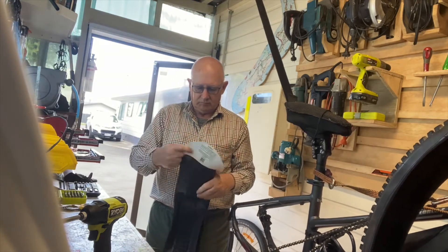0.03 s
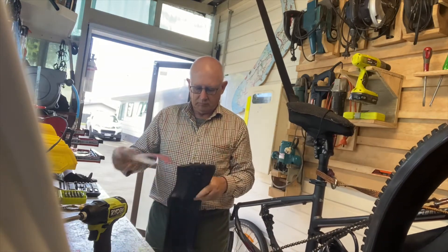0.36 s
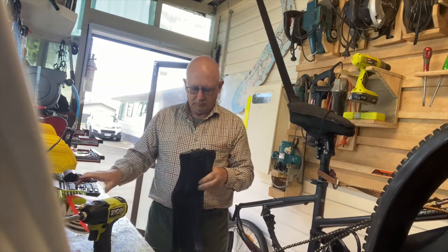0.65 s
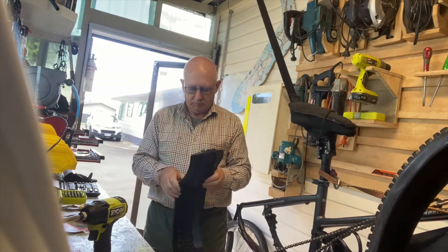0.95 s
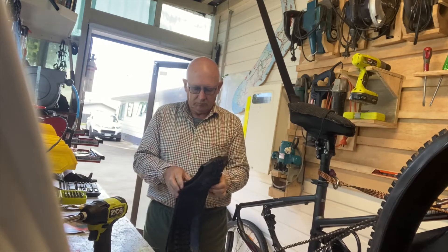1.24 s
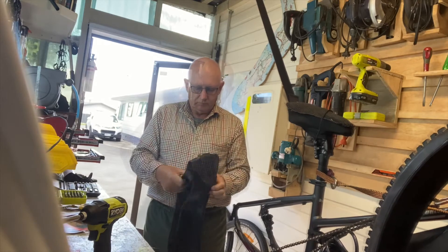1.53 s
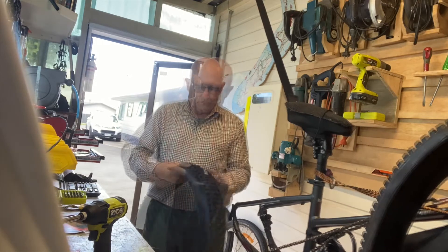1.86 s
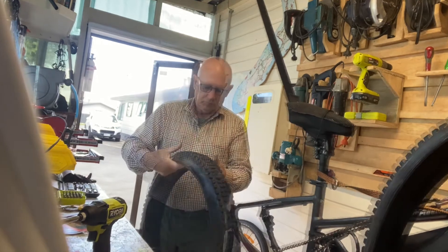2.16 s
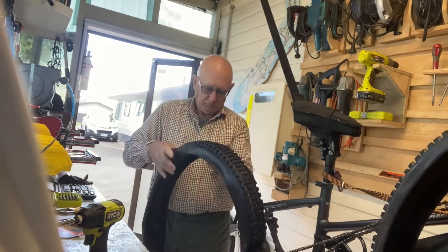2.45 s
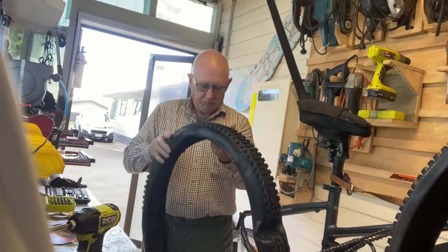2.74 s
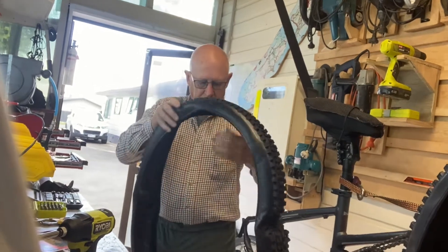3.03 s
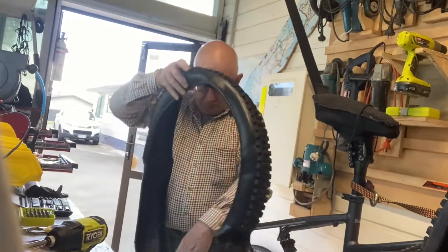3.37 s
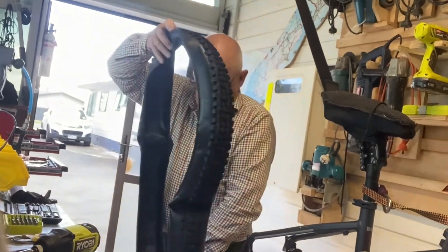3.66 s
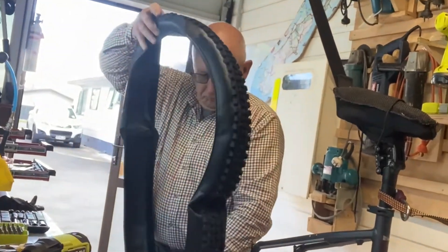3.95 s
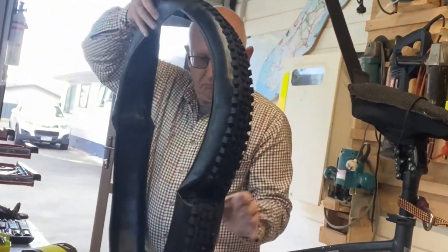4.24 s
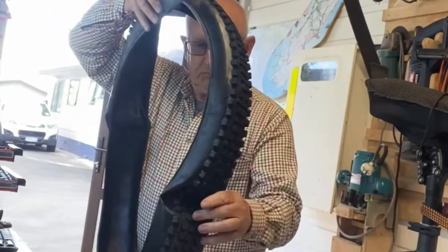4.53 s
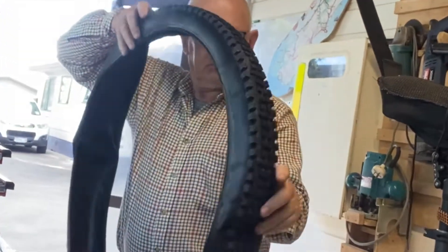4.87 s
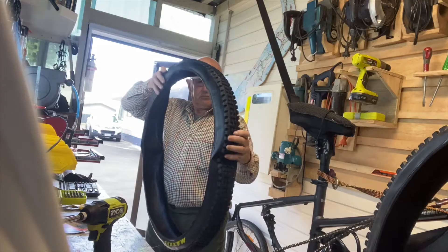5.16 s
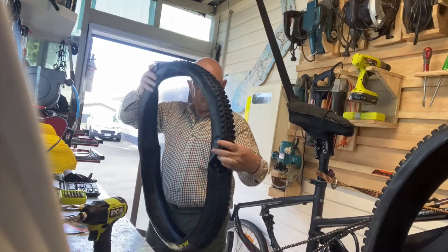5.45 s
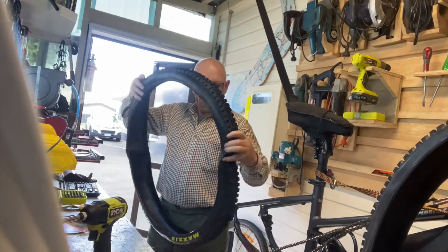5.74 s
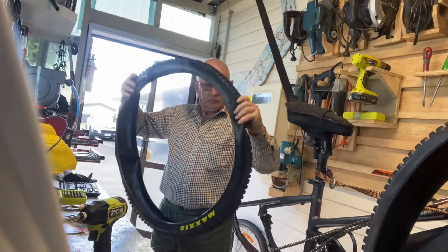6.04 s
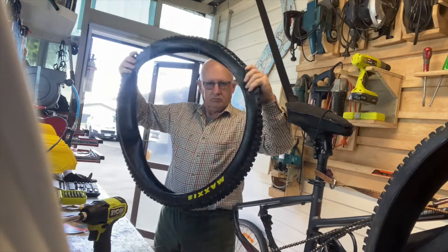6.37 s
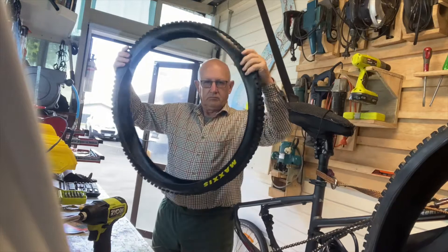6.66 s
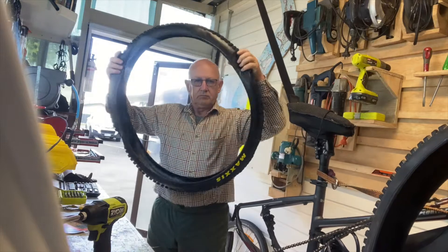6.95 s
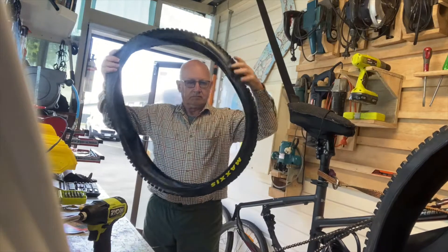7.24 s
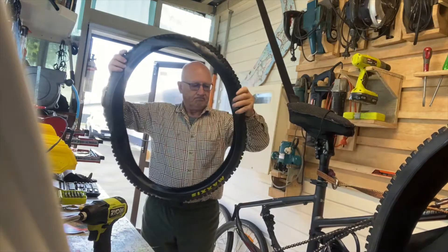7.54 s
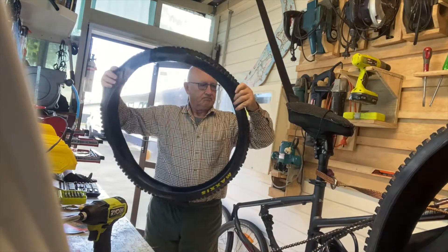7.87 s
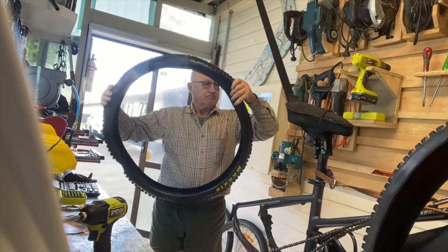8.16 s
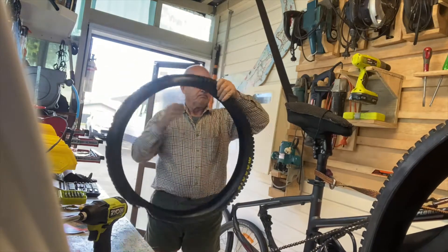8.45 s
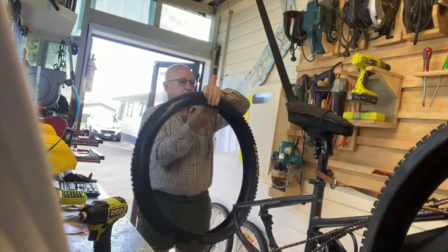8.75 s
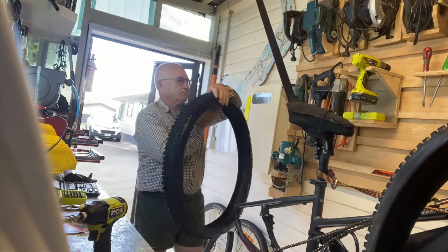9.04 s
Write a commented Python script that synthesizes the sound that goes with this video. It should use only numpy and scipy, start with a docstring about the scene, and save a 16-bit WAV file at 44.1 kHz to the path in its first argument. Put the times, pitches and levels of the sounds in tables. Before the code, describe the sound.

A low machine hum and distant traffic rumble run throughout in a small workshop with short reverberation. At the start, hands rub a nearby rubber bike tyre and it thumps. At 0.5 seconds stiff packaging clacks loudly onto a hollow, booming bench, followed by two small bounces. From 1 second the tyre unfolds with soft, irregular flops, dry ticks, faint hand friction and sleeve swishes. The hum dips around 2 seconds, then pulses slowly as a slightly higher motor joins. Heavier rubber thuds come near 3.7 seconds, and the tyre's edge cracks sharply at 4.9. More flops follow between 5.7 and 6.9 seconds, then a loud pop at 7.5 and a quick double snap at 8.4. The traffic grows from about 5 seconds until the end, just past 9. Very faint, thin squeaks and whistles come and go.

```python
"""Unpacking a bike tyre in a workshop.

Stiff packaging clacks onto a booming bench. The folded rubber casing flops and pops into shape,
with dry ticks and one sharp crack of the bead; hands stick and slip on it and sleeves brush past.
Two machines beat under a higher motor. The room is small and wood-lined; through its open door
street noise slowly grows. Faint, thin squeaks and whistles come and go, perhaps from afar."""
import sys
import numpy as np
from scipy import signal
from scipy.fft import rfft, irfft, next_fast_len
from scipy.io import wavfile
from scipy.ndimage import uniform_filter1d

SR = 44100
rng = np.random.default_rng(int(sys.argv[2]) if len(sys.argv) > 2 else 0)


def to_wav(s):
    """Save 16-bit WAV."""
    ch = np.atleast_2d(s).T  # columns
    pcm = np.round(np.clip(ch, -1, 1) * 32767)  # PCM
    wavfile.write(sys.argv[1], SR, pcm.astype(np.int16))


N = 405719
TIME_S = np.arange(N) / SR

# traffic drawing nearer: time_s, roar_db
TRAFFIC_LEVEL = [(0, -67.5), (4.3, -66.5), (5.6, -58.5), (6.5, -60.5), (9.2, -54.5)]
# spectra of traffic rumble, traffic roar and air hiss: freq_hz, gain_db
RUMBLE_SPECTRUM = [(25, -21), (45, 7.5), (85, 8), (150, 5), (270, -5.5), (400, -12.5), (800, -37)]
ROAR_SPECTRUM = [(170, 7.5), (290, 13), (450, 2.5), (600, 3), (850, -3), (1180, -2), (1700, -11.5),
                 (2600, -21.5), (4000, -29), (12000, -53.5)]
HISS_SPECTRUM = [(500, 3), (2000, 1), (5000, -2.5), (9000, -4.5), (11500, -3.5), (13000, -10)]
# machine hum: time_s, level_db, second_machine_ratio
HUM_LEVEL = [(0, -40, 0.06), (1.6, -40, 0), (2.0, -53, 0), (2.8, -44, 0.26), (4.3, -50, 0.95),
             (5.7, -44, 0.44), (6.6, -48.5, 0.55), (9.2, -48, 0.26)]
# second machine's lead, a beat null at each whole turn: time_s, lead_turns
HUM_LEAD = [(0, .4), (3.12, 3), (4.45, 5), (6.5, 9), (7.25, 11), (9.2, 15)]
# higher motor: time_s, level_db
MOTOR_LEVEL = [(1.7, -84), (2, -60), (5.4, -57.5), (5.7, -49), (6.4, -59.5), (7.4, -48.5), (8.35, -53),
               (9.2, -52)]
# faint, thin gliding squeaks and whistles, perhaps distant:
# start_s, length_s, start_hz, end_hz, width_hz, level_db
THIN_SQUEAKS = [(1.681, 0.23, 2724, 2527, 221, -75), (1.847, 0.95, 2130, 2045, 524, -80),
                (2.252, 0.51, 4200, 4010, 816, -82), (4.429, 0.062, 2120, 1874, 1203, -69),
                (5.073, 0.054, 2920, 3080, 396, -71), (6.932, 0.27, 2030, 2026, 218, -78),
                (7.53, 0.26, 2055, 2052, 147, -70.5), (7.878, 0.15, 2550, 2770, 527, -71),
                (7.98, 0.16, 2350, 2320, 522, -72), (8.197, 0.26, 2110, 2030, 380, -70)]
# workshop decay: freq_hz, t60_s
ROOM_DECAY = [(150, 0.27), (400, 0.34), (1000, 0.23), (3000, 0.26), (7500, 0.26), (13000, 0.24)]
# treble loss at the wooden walls: freq_hz, gain_db
WALL_SPECTRUM = [(3500, 0), (8000, -1), (13000, -2.5)]
# left-right likeness of diffuse sound: freq_hz, correlation
DIFFUSE_CORRELATION = [(60, 1), (130, 0.64), (260, 0.65), (550, 0.0089), (2000, 0.056), (5000, 0.26),
                       (8000, 0.85), (9300, 1), (11500, 0.38)]
# packaging landing on the bench: start_s, clack_db, boom_db, contact_s
LANDINGS = [(0.5435, -28, -35, 0.0047), (0.740, -41.5, -48, 0.0069), (0.779, -47.5, -48.5, 0.0086)]
# bench top and the hollow under it: pitch_hz, level_db, t60_s
BENCH_MODES = [(203, 31, 0.064), (198.7, 5, 0.74), (319, 23.5, 0.066), (304, -2, 0.25), (392, 0, 0.39),
               (623, 15, 0.057), (723, 11.5, 0.044)]
# spectra of packaging clack and casing slap: freq_hz, gain_db
CLACK_SPECTRUM = [(88, -17), (170, -2), (309, -11), (530, -10), (740, -8.5), (1010, -17.5), (1600, -11),
                  (2300, -16), (3300, -17), (4400, -24), (6030, -26.5), (7680, -24), (9200, -38.5),
                  (11000, -25), (13000, -38), (18000, -90)]
SLAP_SPECTRUM = [(200, -22), (400, -4.5), (600, -1.5), (860, 5.5), (1000, -4.5), (1150, 2.5), (1450, -8.5),
                 (1850, 2.5), (2350, -8.5), (2950, -2), (4000, -11.5), (5000, -15), (7300, -12),
                 (9200, -21), (11000, -11), (13000, -26), (18000, -102)]
# sleeves brushing past: centre_s, length_s, level_db
SLEEVE_BRUSHES = [(1.129,0.068,-71), (1.383,0.077,-73), (1.524,0.056,-54), (1.985,0.19,-76),
                  (2.347,0.1,-67), (2.717,0.068,-78), (3.456,0.19,-74), (3.793,.05,-60), (5.51,0.17,-77),
                  (5.997,0.17,-75), (6.356,0.16,-71.5)]
# hands sliding on rubber: centre_s, length_s, level_db, grip_db
HAND_STROKES = [(0.005, 0.043, -53, 15.5), (0.91, 0.28, -72.5, 9), (1.147, 0.15, -76.5, 9.5),
                (1.419, 0.39, -76.5, 7.5), (1.642, 0.26, -69, 12.5), (2.195, 0.057, -79.5, 7.5),
                (2.387, 0.42, -86.5, 14), (2.604, 0.92, -83, 9), (2.93, 0.11, -81.5, 6),
                (3.28, 0.14, -79, 12), (3.392, 0.087, -69, 9), (3.547, 0.067, -78.5, 4),
                (3.735, 0.53, -80, 10.5), (4.536, 0.39, -81, 10), (4.799, 0.039, -71.5, 8),
                (5.106, 0.23, -75.5, 10.5), (5.334, 0.059, -80.5, 8), (5.626, 0.16, -80.5, 11.5),
                (6.515, 0.15, -74.5, 10), (6.755, 0.14, -69.5, 7.5), (7.151, 0.082, -71, 8.5),
                (7.284, 0.028, -69.5, 11), (8.163, 0.14, -72, 11.5), (9.016, 0.3, -77, 11)]
# friction spectra for firm, medium and light touch: freq_hz, gain_db
CREAK_SPECTRUM = [(150, -35), (320, -8), (580, 0), (740, -10.5), (950, 0), (1250, -11.5), (1700, -18),
                  (3000, -17)]
RUB_SPECTRUM = [(800, -76), (1500, 13.5), (2100, 15), (3200, -16), (4500, -10), (8000, -62)]
SWISH_SPECTRUM = [(2000, -61), (4000, -22), (5500, -19.5), (7500, -7.5), (9200, -16), (11300, 6.5),
                  (12500, -13.5), (14000, 3)]
# dry ticks and one loud, sharp crack of the tyre bead: start_s, level_db, pitch_hz
TICKS_AND_CRACK = [(1.282,-60,1520), (1.565,-70,1140), (3.247,-69,1450), (3.388,-68,1000),
                   (4.911,-43.5,1850), (5.113,-58,930), (6.204,-65.5,1490), (6.776,-60,1410),
                   (6.813,-59,850)]
# casing flops and pops, the first row a card snapping off the tyre: # start_s, contact_s, slap_db,
# tilt_db_per_octave, thud_db, thud_hz, ring_db, ring_hz
TYRE_FLOPS = [(0.0388,0.0021,-40,-2,-34.5,178,-46,489), (0.982,0.0046,-64,1.5,-54,200,-61,1000),
              (1.254,0.003,-63,2.5,-75,260,-57.5,1080), (1.283,0.0017,-56,-7.5,-80,340,-58,980),
              (1.338,0.004,-64,-6,-73,200,-60,900), (1.479,0.0074,-63,-4,-56.5,284,-59.5,696),
              (1.708,0.01,-58.5,-12,-54.5,290,-53.5,610), (1.813,0.0056,-63.5,-4,-49,296,-51.5,840),
              (2.273,0.006,-69,-18,-59.5,365,-68,484), (2.543,0.016,-62,9,-67,199,-66.5,1990),
              (2.605,0.0025,-63,-0.5,-55,163,-64.5,530), (2.818,0.025,-57.5,0.5,-49,348,-64,2660),
              (3.166,0.0064,-65,-3.5,-58.5,304,-75,920), (3.655,0.018,-63,15,-39.5,152,-48.5,480),
              (3.692,0.0047,-51,-3,-40,290,-59,576), (3.94,0.0058,-54.5,-12.5,-53,193,-54.5,867),
              (3.974,0.015,-64.5,0,-61,318,-62,1140), (4.381,0.0019,-83,1,-56,271,-69.5,1770),
              (4.9091,0.0029,-47,-2,-68,330,-52.5,1010), (5.031,0.005,-57,-3.5,-52,173,-54,486),
              (5.686,0.012,-54.5,1,-49.5,340,-65,1020), (5.982,0.0027,-62,-4.5,-63.5,330,-61,1115),
              (6.412,0.0034,-52.5,-5.5,-52,174,-54,1114), (6.867,0.016,-51,2.5,-48,162,-52.5,524),
              (7.454,0.01,-64,7,-53,258,-51,1130), (7.4824,0.0069,-36.5,-5,-51,298,-39.5,1110),
              (7.486,0.011,-54,5.5,-66,300,-48,1720), (7.509,0.0022,-59,-9,-41.5,290,-52.5,2670),
              (7.859,0.0055,-60.5,9,-61,169,-75,1000), (8.238,0.0026,-63,4,-61,200,-69,3270),
              (8.380,0.0025,-46,3.5,-74,170,-53,3000), (8.386,0.002,-41.5,1.5,-70,170,-46.5,1370)]


def from_db(db):
    """Decibels to gain."""
    return 10 ** (np.asarray(db) / 20)


def unit_rms(x):
    """Scale to rms 1."""
    return x / np.sqrt(np.mean(x ** 2) + 1e-20)


def unit_blow(x):
    """Scale to the energy of 20 ms at rms 1."""
    return x / np.sqrt(np.sum(x ** 2) / (SR * 0.02) + 1e-20)


def in_time(table):
    """Each value column, interpolated to every sample."""
    times_s, *columns = np.transpose(table)
    return [np.interp(TIME_S, times_s, column) for column in columns]


def at_hz(table, hz):
    """Interpolate on a log-frequency axis."""
    freqs_hz, values = np.transpose(table)
    return np.interp(np.log(hz), np.log(freqs_hz), values)


def drift(rate_hz):
    """Random wander between unit Gaussian knots."""
    knots = rng.standard_normal(4096)
    return np.interp(TIME_S * rate_hz, np.arange(len(knots)), knots)


def add(track, start_s, sound):
    """Mix in place, cropped to the track."""
    start = round(start_s * SR)
    part = sound[max(-start, 0):N - start]
    start = max(start, 0)
    track[start:start + len(part)] += part


def swells(moves):
    """Half-sine speed envelope for each move."""
    speed = np.zeros(N)
    for centre_s, length_s, level_db in moves:
        arch = np.sin(np.linspace(0, np.pi, int(length_s * SR)))
        add(speed, centre_s - length_s / 2, from_db(level_db) * arch)
    return speed


def resonance(x, pitch_hz, width_hz):
    """Two-pole resonator, unity peak gain."""
    radius = np.exp(-np.pi * width_hz / SR)
    feedback = [1, -2 * radius * np.cos(2 * np.pi * pitch_hz / SR), radius ** 2]
    return signal.lfilter(np.array([1, 0, -1]) * (1 - radius ** 2) / 2, feedback, x + 1e-18)


def damped_ring(touch, pitch_hz, width_ratio):
    """Heavily damped ring: two resonators in series."""
    width_hz = width_ratio * pitch_hz
    return unit_blow(resonance(resonance(touch, pitch_hz, width_hz), pitch_hz, width_hz))


def colour(noise, spectrum):
    """Shape steady noise to rms 1, falling 12 dB per octave past the last point."""
    size = next_fast_len(N)
    hz = np.maximum(np.arange(size // 2 + 1) * SR / size, 1)
    rolloff = np.maximum(hz / spectrum[-1][0], 1) ** 2
    gain = from_db(at_hz(spectrum, hz)) * (hz > 20) / rolloff
    return unit_rms(irfft(rfft(noise, size) * gain, size)[..., :N])


def minimum_phase(x, spectrum, tilt_db_per_octave=0):
    """Causal shaping of a transient, tilted above 1 kHz."""
    hz = np.maximum(np.abs(np.fft.fftfreq(len(x), 1 / SR)), 1)
    gain_db = at_hz(spectrum, hz) + tilt_db_per_octave * np.maximum(np.log2(hz / 1000), 0)
    response = np.exp(np.conj(signal.hilbert(np.log(from_db(gain_db)))))
    return np.fft.ifft(np.fft.fft(x) * response).real


def diffuse(size):
    """Stereo white noise, alike in the bass and partly so above."""
    mid, side = rfft(rng.standard_normal((2, next_fast_len(size))))
    hz = np.linspace(1, SR / 2, len(mid))
    correlation = np.clip(at_hz(DIFFUSE_CORRELATION, hz), -1, 1)
    return irfft(np.sqrt(1 + correlation) * mid + np.sqrt(1 - correlation) * side * [[1], [-1]])[:, :size]


def contact(decay_s, grit_db, snap, rise_ratio=0.18):
    """A snap, then a dying cluster of uneven micro-slips, whitened to have no pitch."""
    size = SR // 5
    age = TIME_S[:size] / decay_s
    slips = rng.standard_normal(size)
    slips *= from_db(grit_db * np.repeat(rng.standard_normal(size), 16)[:size])
    envelope = np.exp(-age) * (1 - np.exp(-age / rise_ratio))
    spectrum = rfft(slips * envelope + snap * (age == 0), 2 * size)
    smooth_power = uniform_filter1d(np.abs(spectrum) ** 2, size=120)
    return irfft(spectrum / np.sqrt(smooth_power + 1e-12))[:size]


def street(mean_rumble_db=-51.5, rumble_slope=0.28, hiss_db=-83.2):
    """Far traffic over steady air hiss; the rumble grows more slowly than the roar."""
    roar_db, = in_time(TRAFFIC_LEVEL)
    rumble_db = mean_rumble_db + rumble_slope * (roar_db - roar_db.mean())
    rumble = from_db(rumble_db) * colour(diffuse(N), RUMBLE_SPECTRUM)
    roar = from_db(roar_db) * colour(diffuse(N), ROAR_SPECTRUM)
    hiss = from_db(hiss_db) * colour(diffuse(N), HISS_SPECTRUM)
    return rumble + roar + hiss


def machines(hum_hz=57.5, motor_hz=126.8, flutter_db=2.0, pan_db=0.73):
    """Two machines at nearly equal speed beat under a higher, fluttering motor."""
    hum_db, second_ratio = in_time(HUM_LEVEL)
    lead_turns, = in_time(HUM_LEAD)
    motor_db, = in_time(MOTOR_LEVEL)
    phase = 2 * np.pi * hum_hz * TIME_S
    hum = from_db(hum_db) * (np.sin(phase) - second_ratio * np.sin(phase + 2 * np.pi * lead_turns))
    motor_gain = from_db(motor_db + flutter_db * drift(8.1))
    motor = motor_gain * np.sin(2 * np.pi * motor_hz * TIME_S + drift(2.068))
    return np.sqrt(2) * (hum * from_db([[pan_db], [-pan_db]]) + motor)


def squeaks(falter_db=3.0):
    """Faint, thin squeaks and whistles: narrow noise bands that glide, swell and falter."""
    out = np.zeros(N)
    for start_s, length_s, start_hz, end_hz, width_hz, level_db in THIN_SQUEAKS:
        size = int(length_s * SR)
        phase = 2 * np.pi * np.cumsum(np.linspace(start_hz, end_hz, size)) / SR
        band = drift(width_hz)[:size] * np.sin(phase) + drift(width_hz)[:size] * np.cos(phase)
        swell = np.sqrt(np.abs(np.sin(np.linspace(0, np.pi, size))))
        gain = from_db(level_db + falter_db * drift(46)[:size])
        add(out, start_s, gain * swell * band)
    return out


def workshop(x, build_s=0.00023):
    """Dense reflections decaying by band; wooden walls absorb treble."""
    age_s = TIME_S[:SR // 2]
    edges_hz = np.geomspace(90, 16000, 13)
    noises = [diffuse(len(age_s)) for _ in range(2)]
    tail = 0
    for k, (low_hz, high_hz) in enumerate(zip(edges_hz, edges_hz[1:])):
        bandpass = signal.butter(2, [low_hz, high_hz], "band", fs=SR, output="sos")
        t60_s = at_hz(ROOM_DECAY, np.sqrt(low_hz * high_hz))
        tail += signal.sosfilt(bandpass, noises[k % 2]) * from_db(-60 * age_s / t60_s)
    tail = unit_rms(tail * (1 - np.exp(-age_s / build_s))) / np.sqrt(len(age_s))
    tail = np.array([minimum_phase(channel, WALL_SPECTRUM) for channel in tail])
    return signal.fftconvolve(x[None], tail, axes=1)[:, :N]


def bench(rise_cycles=3.96):
    """Each landing rings the bench modes; they build over a few cycles, so lows come last."""
    out, age_s = np.zeros(N), TIME_S[:SR]
    for start_s, _, boom_db, _ in LANDINGS:
        for pitch_hz, level_db, t60_s in BENCH_MODES:
            build = 1 - np.exp(-(age_s * pitch_hz / rise_cycles) ** 2)
            decay = from_db(boom_db + level_db - 60 * age_s / t60_s)
            add(out, start_s, build * decay * np.sin(2 * np.pi * pitch_hz * age_s))
    return out


def packaging():
    """Stiff packaging clacks on the bench."""
    out = np.zeros(N)
    for start_s, clack_db, _, contact_s in LANDINGS:
        clack = minimum_phase(contact(contact_s, grit_db=4, snap=6.3), CLACK_SPECTRUM)
        add(out, start_s, from_db(clack_db) * unit_blow(clack))
    return out


def sleeves(flicker_db=1.5):
    """Brushing cotton: flickering treble hiss that swells with each move."""
    flicker = from_db(flicker_db * drift(110))
    return swells(SLEEVE_BRUSHES) * flicker * colour(rng.standard_normal(N), SWISH_SPECTRUM)


def hands(creak_db=-0.5, rub_db=2.0, swish_db=15.0, base_catches_per_s=80, catch_db=31, uneven_db=5.5):
    """Stick-slip on rubber: hiss with clumps of catches. A firm grip creaks, a light one swishes."""
    out, tack = np.zeros(N), drift(45)
    layers = (CREAK_SPECTRUM, creak_db, 1), (RUB_SPECTRUM, rub_db, 0), (SWISH_SPECTRUM, swish_db, -1)
    for spectrum, layer_db, grip_sign in layers:
        speed = swells((centre_s, length_s, level_db + grip_sign * grip_db)
                       for centre_s, length_s, level_db, grip_db in HAND_STROKES)
        catches = rng.random(N) < base_catches_per_s * from_db(6 * tack) / SR
        friction = rng.standard_normal(N) * (1 + from_db(catch_db) * catches)
        gain = from_db(layer_db + uneven_db * (tack + drift(81)) / 2)
        out += speed * gain * colour(friction, spectrum)
    return out


def ticks_and_crack():
    """Dry ticks and one sharp crack of the bead: brief bursts through a broad resonance."""
    out = np.zeros(N)
    for start_s, level_db, pitch_hz in TICKS_AND_CRACK:
        burst = contact(decay_s=0.0022, grit_db=6, snap=1.8)
        add(out, start_s, from_db(level_db) * damped_ring(burst, pitch_hz, width_ratio=0.38))
    return out


def tyre(grit_db=5.5, thud_lag_s=0.00198, thud_contact_s=0.004):
    """Each flop: a slap, brighter when hard, a ring of stretched casing, a thud of swinging bulk."""
    out = np.zeros(N)
    for start_s, contact_s, slap_db, tilt_db_per_octave, thud_db, thud_hz, ring_db, ring_hz in TYRE_FLOPS:
        slap = minimum_phase(contact(contact_s, grit_db, snap=5.6), SLAP_SPECTRUM, tilt_db_per_octave)
        ring = damped_ring(contact(contact_s, grit_db, snap=2.1), ring_hz, width_ratio=0.25)
        thud = damped_ring(contact(thud_contact_s, grit_db, snap=3.2), thud_hz, width_ratio=0.53)
        add(out, start_s, from_db(slap_db) * unit_blow(slap) + from_db(ring_db) * ring)
        add(out, start_s + thud_lag_s, from_db(thud_db) * thud)
    return out


def direct(x, pan_db, gain_db=-4.5, left_lag_s=0.000125):
    """Direct path, slightly late on the left; positive pan favours the left."""
    left = np.roll(x, round(left_lag_s * SR))
    return from_db(gain_db) * np.array([left, x]) * from_db([[pan_db], [-pan_db]])


def scene(tick_send_db=-7, boom_send_db=-9):
    """Tyre and bench over machines and street; ticks, crack and boom are drier than the rest."""
    centre = tyre() + hands() + sleeves() + squeaks()
    ticks, clack, boom = ticks_and_crack(), packaging(), bench()
    room = workshop(centre + clack + from_db(tick_send_db) * ticks + from_db(boom_send_db) * boom)
    straight = direct(centre + ticks + boom, pan_db=0.6) + direct(clack, pan_db=2.0)
    return straight + room + machines() + street()


def record(dry, mid_gain=0.24, presence_gain=0.34, cutoff_hz=13000):
    """Left channel favours presence, right the mids; steep treble cut on both."""
    presence = presence_gain * resonance(dry, pitch_hz=3600, width_hz=1700)
    mids = mid_gain * resonance(dry, pitch_hz=1400, width_hz=1300)
    tilted = dry + np.array([[1], [-1]]) * (presence - mids)
    lowpass = signal.ellip(8, 0.3, 70, cutoff_hz, fs=SR, output="sos")
    return signal.sosfilt(lowpass, tilted)


dry = scene()
out = record(dry)
to_wav(out)
```